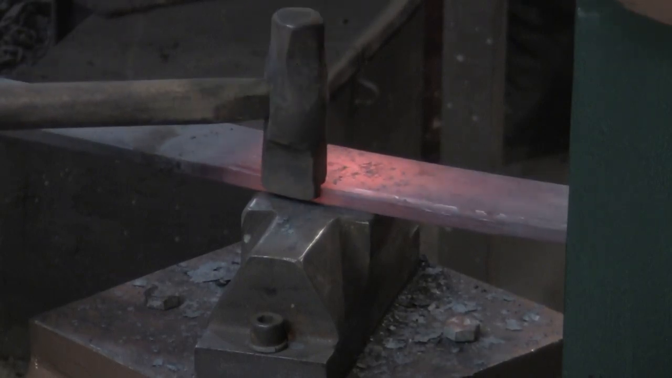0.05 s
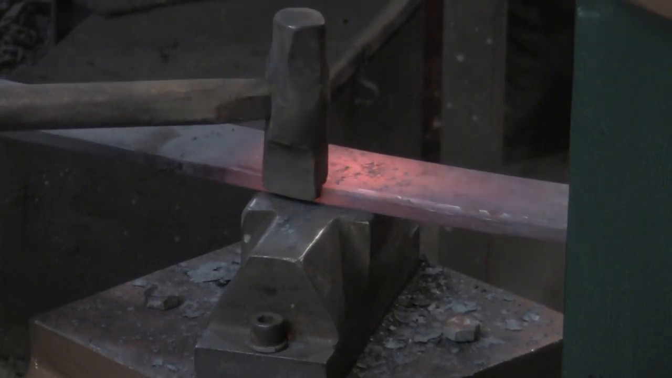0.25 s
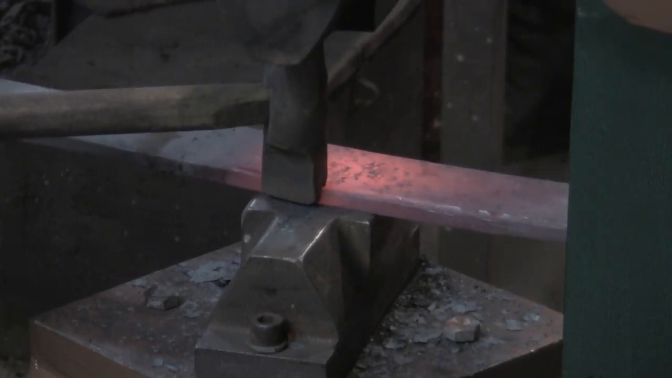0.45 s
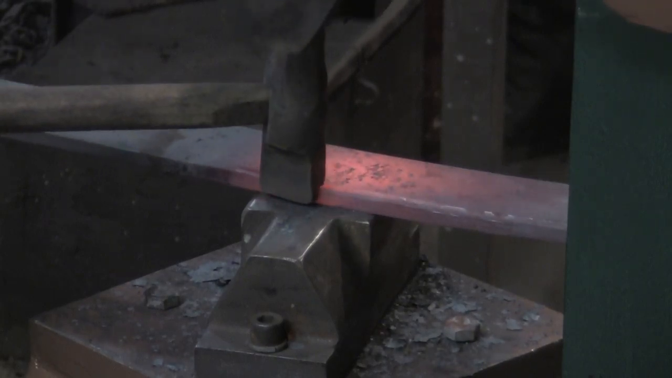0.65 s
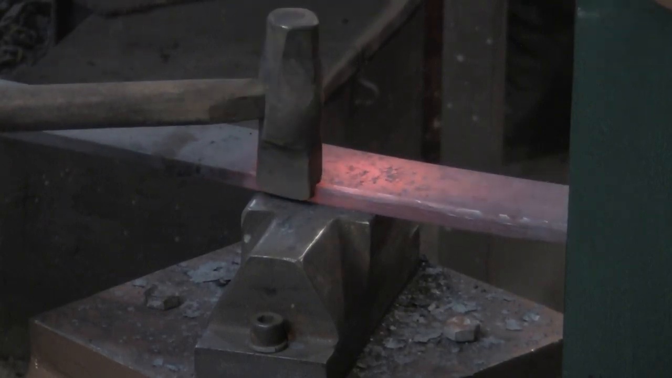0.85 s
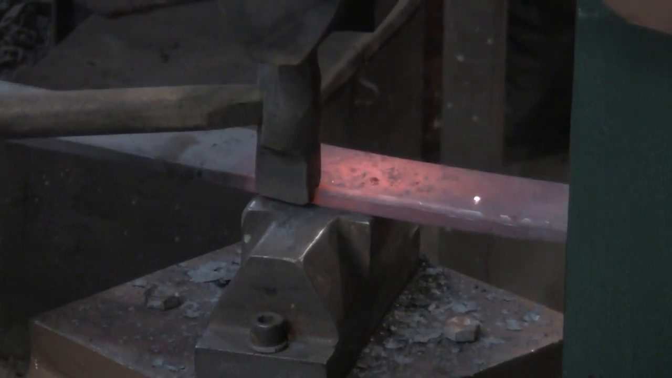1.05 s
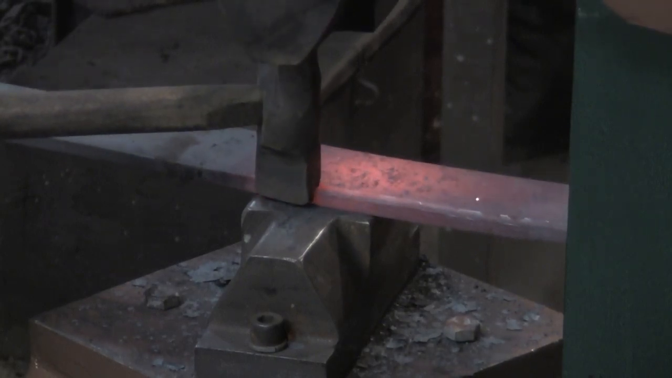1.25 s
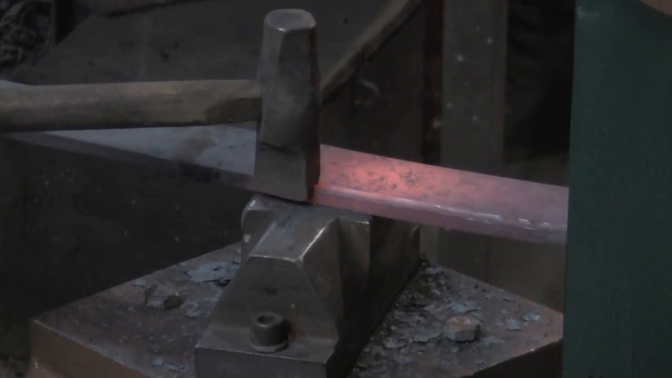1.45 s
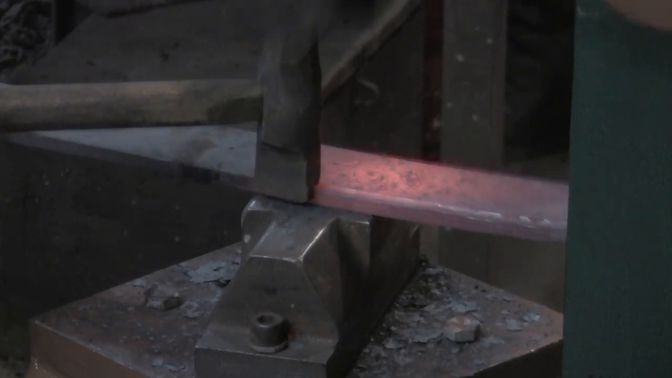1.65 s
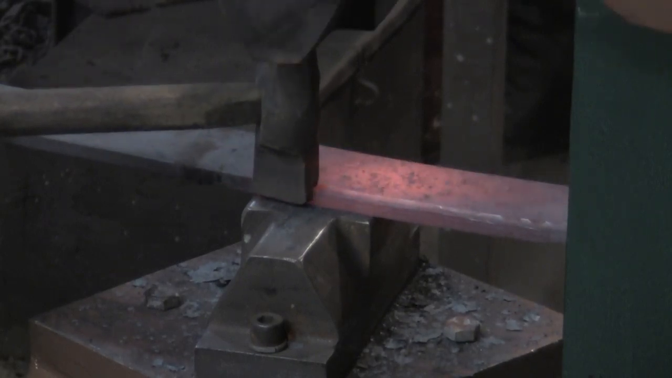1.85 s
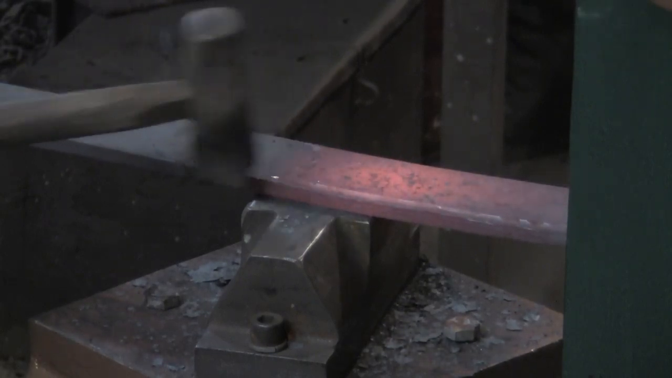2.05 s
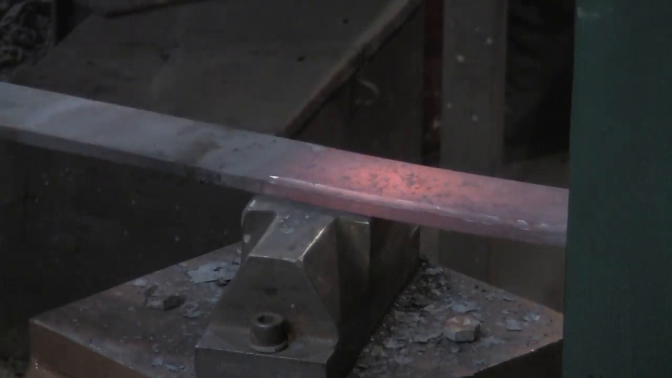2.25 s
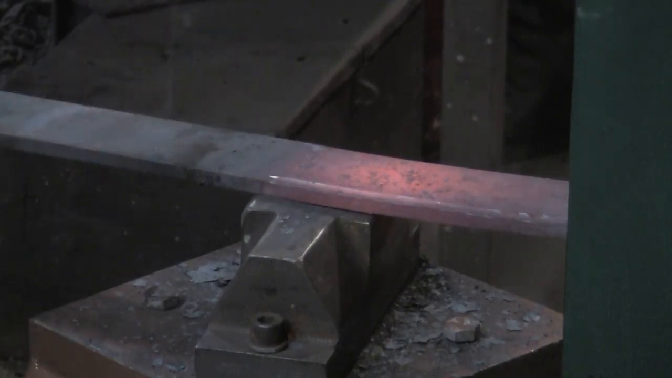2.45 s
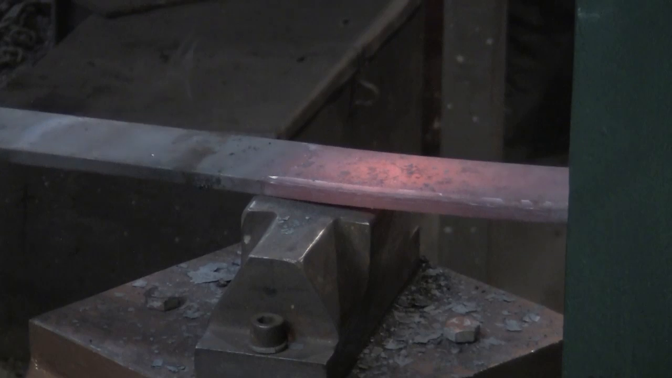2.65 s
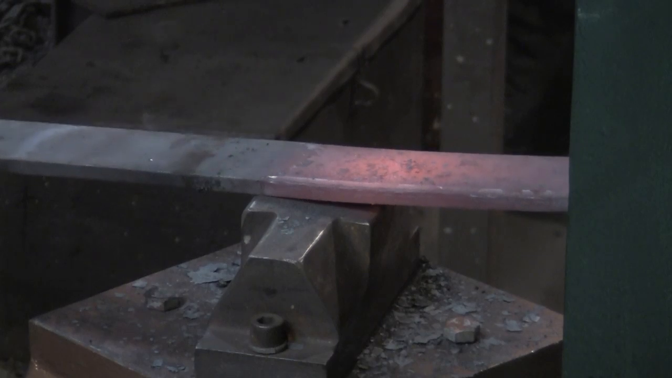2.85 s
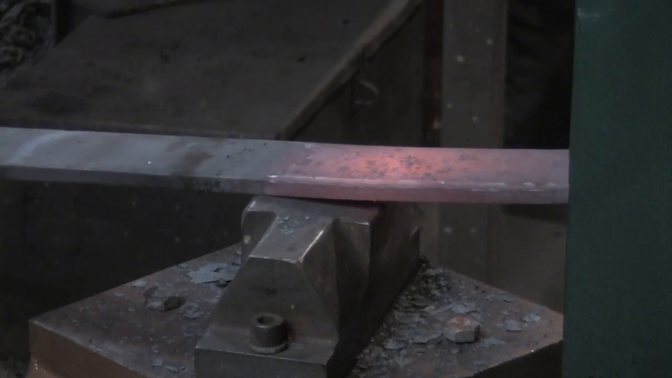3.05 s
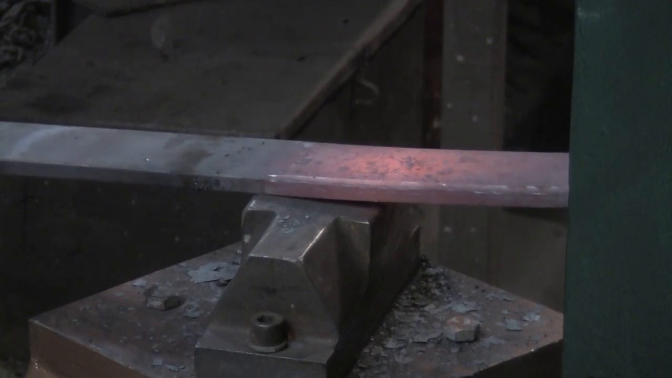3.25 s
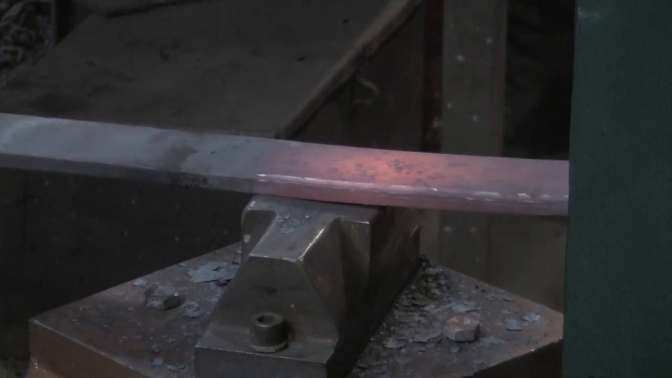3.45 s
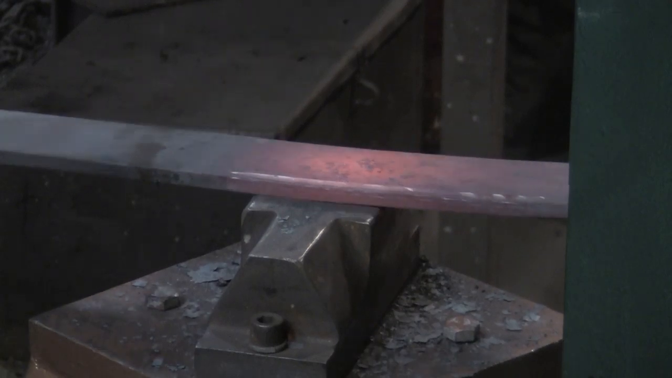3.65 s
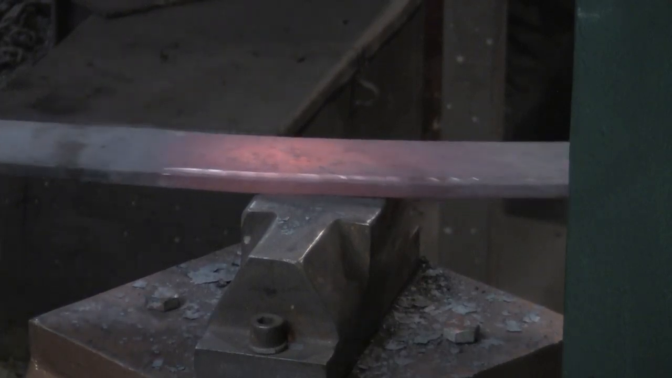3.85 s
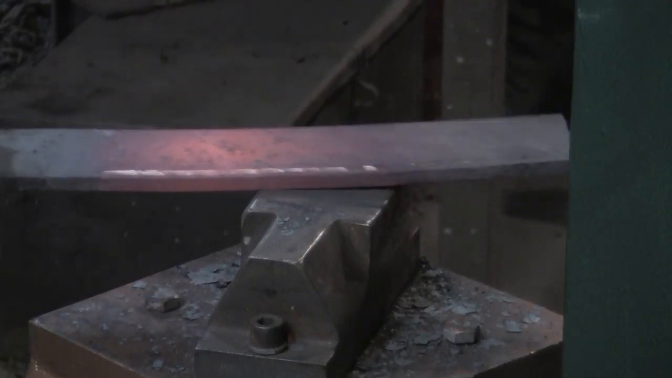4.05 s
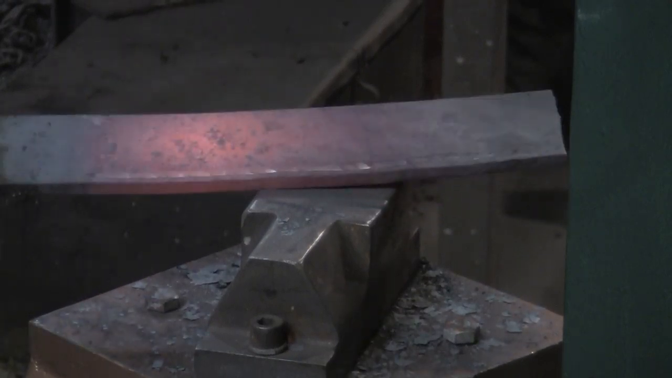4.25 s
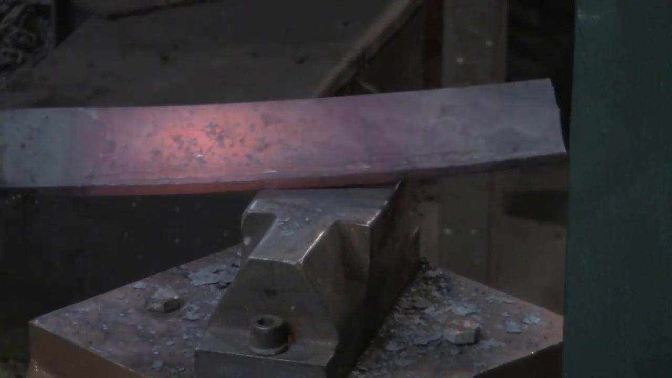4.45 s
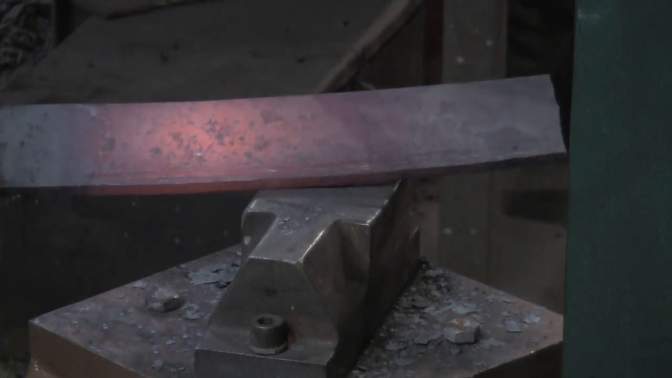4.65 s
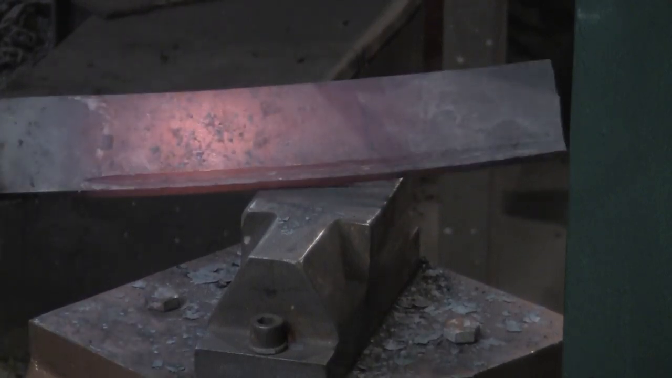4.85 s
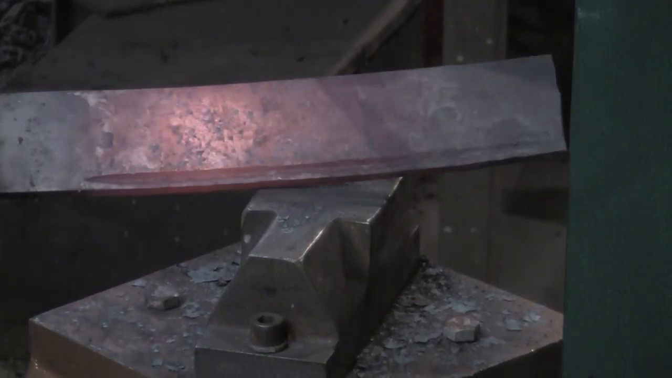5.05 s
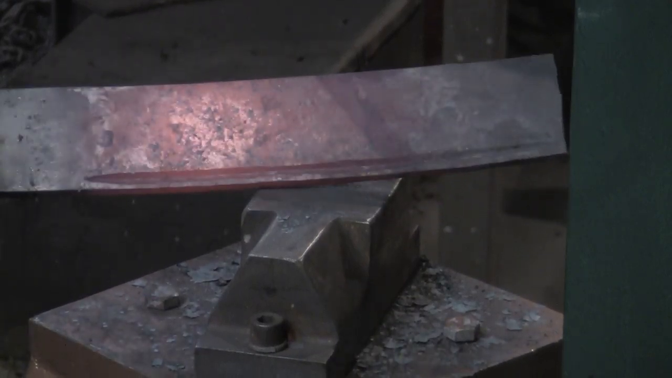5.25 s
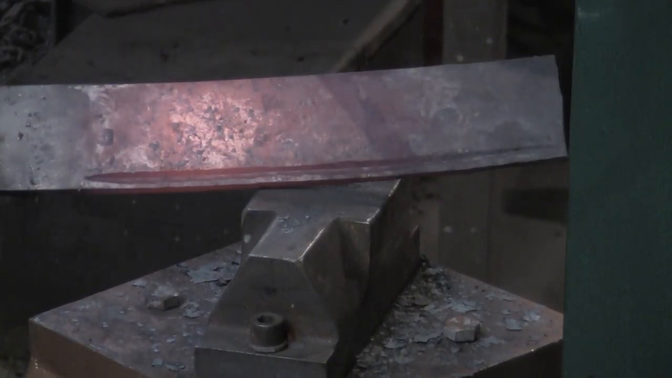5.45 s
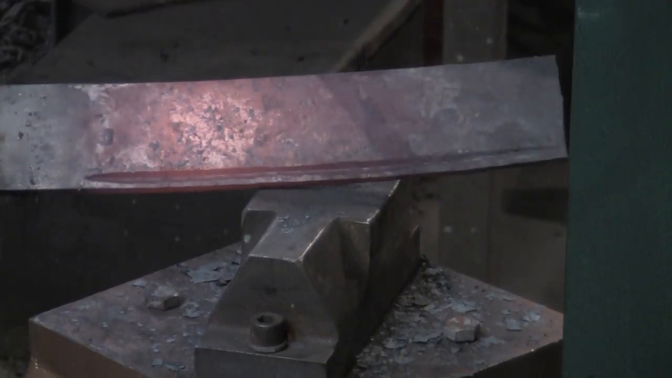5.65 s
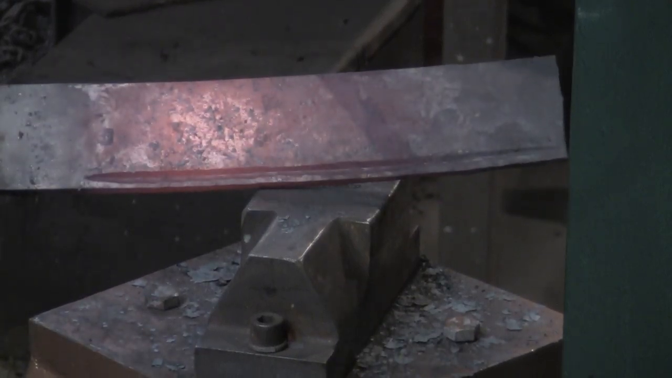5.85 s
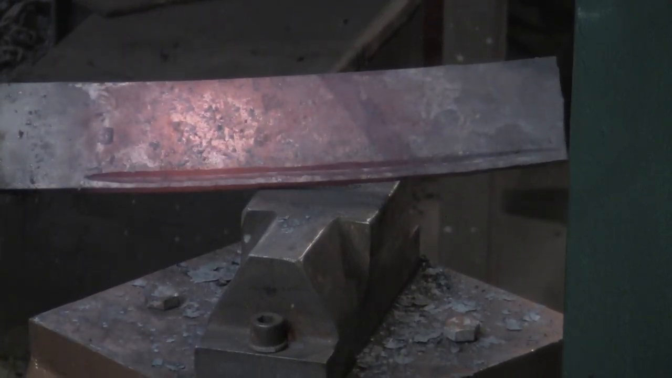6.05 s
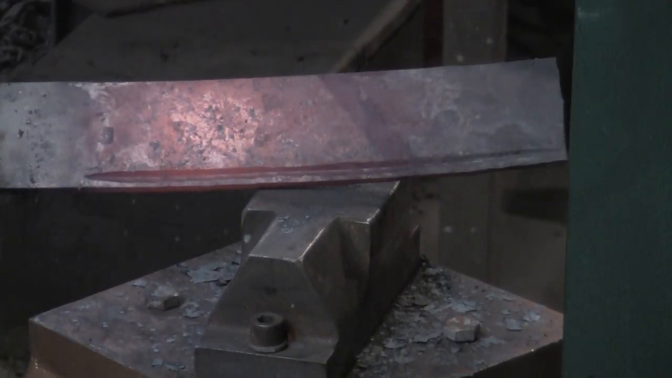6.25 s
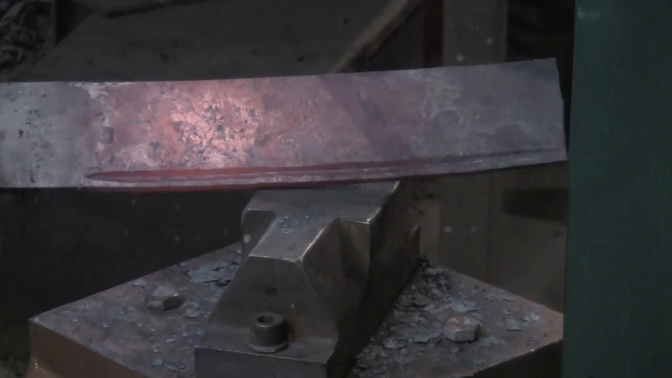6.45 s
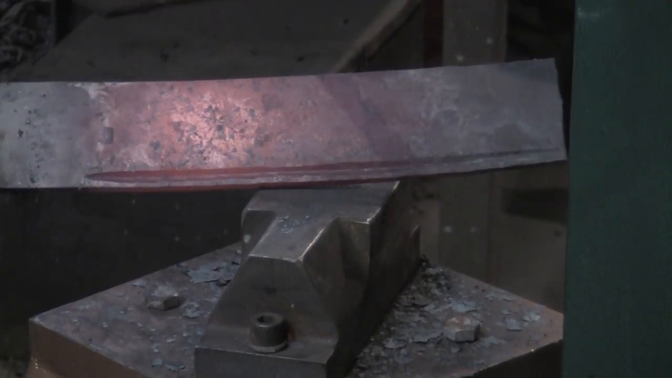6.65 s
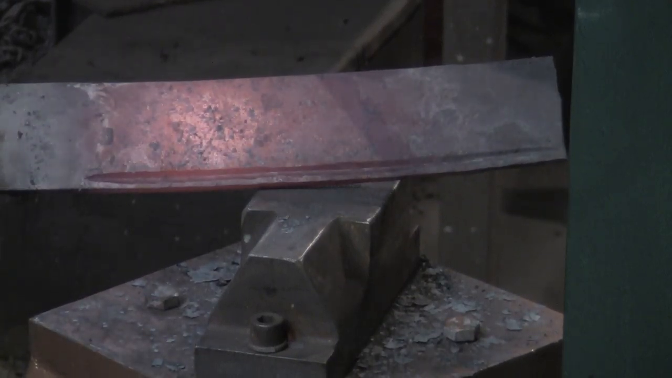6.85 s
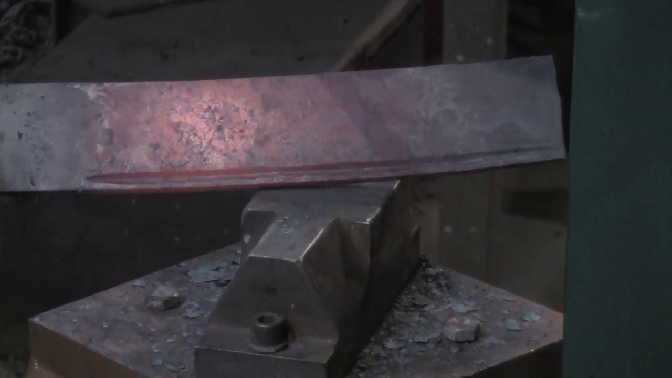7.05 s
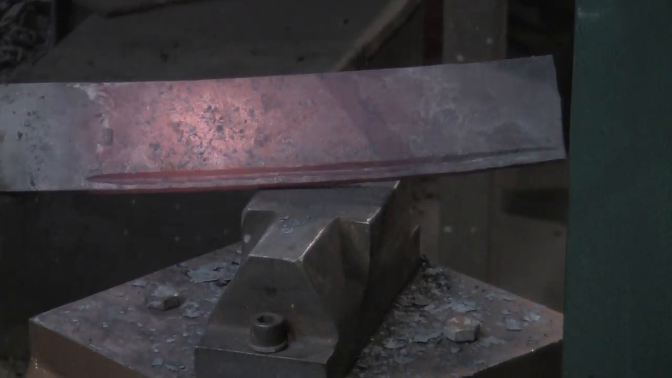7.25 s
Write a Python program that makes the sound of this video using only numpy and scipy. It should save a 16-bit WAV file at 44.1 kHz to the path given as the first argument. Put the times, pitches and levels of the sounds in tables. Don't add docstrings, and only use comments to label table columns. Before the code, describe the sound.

An air hammer slams three times in a hard, echoing forge, stops with a hiss and knock; metal clanks, drags briefly, and a low roar remains.

```python
import sys
import numpy as np
from scipy import signal
from scipy.fft import rfft, irfft, next_fast_len
from scipy.io import wavfile

SR = 44100
rng = np.random.default_rng(int(sys.argv[2]) if len(sys.argv) > 2 else 0)


def bounce(signal):
    frames = np.transpose(np.atleast_2d(signal))
    limited = np.clip(frames, -1, 1)
    pcm = np.round(limited * 32767).astype(np.int16)
    wavfile.write(sys.argv[1], SR, pcm)


def attenuation_scalar(level_db):
    decades = np.asarray(level_db, float) / 20
    return 10 ** decades


N = 321930
T = np.arange(N) / SR
PAD = next_fast_len(N + 2 * SR)

# t/s, body level/dB, crack level/dB, ring level/dB
BLOWS = [
    (0.3961, 23.5, 35, 19),
    (1.0753, 25, 33, 20.5),
    (1.7558, 25, 34.5, 23),
]
# f/Hz, density/dB per Hz
BLOW_COLOUR = [(50, -85), (110, -20.5), (200, -6.5), (400, -11.5), (1160, -7), (1450, -15), (1850, -5),
               (2300, -15.5), (3970, -16.5), (5500, -24), (8000, -25.5), (9800, -30), (11500, -64)]
# f/Hz, level/dB, t60/s
RAM_CRACK = [(3970, 8.5, 0.015), (3340, 0, 0.025), (2625, 1, 0.026), (323, 6.5, 0.049), (760, -25.5, 0.065),
             (1420, -15.5, 0.09)]
RAM_HZ = [1787, 1923, 371, 824, 1163, 2408, 3736, 4021]
# level/dB, t60/s
RAM_RING = [(-2.5, 0.58), (5.5, 0.43), (-12.5, 0.69), (0.5, 0.1), (-31, 0.17), (-14, 0.33), (-4, 0.11),
            (-30, .12)]
# f/Hz, density/dB per Hz
KNOCK_COLOUR = [(120, -14.5), (220, -11.5), (750, -11), (2400, -13.5), (5000, -22), (12000, -27.5)]
# f/Hz, level/dB, t60/s
KNOCK_CRACK = [(192, 2.5, 0.1), (754, 9, 0.037), (2320, -14.5, .04)]
KNOCK_HZ = [2330, 2900, 760]
# level/dB, t60/s
KNOCK_RING = [(7, 0.15), (-2.5, 0.1), (-2, 0.57)]
# f/Hz, density/dB per Hz
EXHAUST_COLOUR = [(290, -62.5), (500, -9.5), (1180, -6.5), (1660, -4.5), (1880, 9.5), (2130, -10.5),
                  (2350, 3.5), (2850, -7), (3060, -2.5), (7200, -6.5), (9490, -1.5), (12700, -15),
                  (13600, -55)]
# f/Hz, density/dB per Hz
INLET_COLOUR = [(600, -30), (1500, -7.5), (3000, -13.5), (5000, -13.5), (8500, -7.5), (9800, -10.5),
                (11300, -13.5), (12600, -13), (13600, -32)]
# f/Hz, width/Hz, level/dB
WHISTLES = [
    (9080, 240, -7.5),
    (9680, 530, -0.5),
]
# t/s, body level/dB, crack level/dB, ring level/dB
TOOL_DOWN = [
    (2.230, 22.5, 35, -9),
    (2.282, 10.5, 21, 14),
]
# f/Hz, density/dB per Hz
TOOL_COLOUR = [(150, -82), (300, -22.5), (500, -18), (811, -9), (1200, -15.5), (1530, -9), (2100, -19.5),
               (4000, -31.5), (9460, -42), (11000, -82)]
# f/Hz, level/dB, t60/s
TOOL_CRACK = [(1630, 8, 0.028), (730, -2.5, 0.068), (2230, -14, 0.012), (4000, -11, 0.0072)]
TOOL_HZ = [764, 829, 974, 1254, 1523, 1680, 1760]
# level/dB, t60/s
TOOL_RING = [(6, 0.092), (-3, .1), (-2, 0.08), (-6.5, 0.15), (-3.5, 0.31), (-7.5, .3), (-31, .2)]
# t/s, body level/dB, crack level/dB, ring level/dB
BAR_DROP = [
    (2.8733, 20.5, 33.5, 20.5),
]
# f/Hz, density/dB per Hz
BAR_COLOUR = [(100, -98), (300, -60), (600, -5.5), (1050, -8), (2690, -10.5), (3300, -15.5), (4000, -19),
              (6000, -27), (9950, -28), (11000, -74)]
# f/Hz, level/dB, t60/s
BAR_CRACK = [(1246, 2.5, 0.21), (2620, -5.5, 0.0084), (1600, -3.5, 0.052)]
BAR_HZ = [894, 980, 1254, 1350, 1610, 1820, 2024, 2116, 2309, 2482, 2589, 2660, 2772, 2896, 3262, 3758,
          3951]
# level/dB, t60/s
BAR_RING = [(-0.5, 0.42), (-0.5, 0.29), (-5.5, 0.53), (3, 0.29), (2, 0.36), (0.5, 0.3), (4.5, 0.17),
            (0, 0.25), (-5, 0.26), (1.5, 0.43), (-12, 0.36), (1, 0.17), (-1, 0.47), (-3.5, 0.22),
            (-14, 0.15), (-9, 0.21), (-4, 0.2)]
# t/s, body level/dB, crack level/dB, ring level/dB
HEEL_DROP = [
    (2.920, 16.5, 8, 15),
]
# f/Hz, density/dB per Hz
HEEL_COLOUR = [(100, -65), (220, -31), (400, -3.5), (800, -5.5), (1500, -9), (4000, -51), (11000, -62)]
# f/Hz, level/dB, t60/s
HEEL_CRACK = [(800, 0, .03), (2600, -10, .015)]
HEEL_HZ = [300, 420, 581, 668, 727, 810]
# level/dB, t60/s
HEEL_RING = [(-1, 0.16), (4, 0.45), (1, 0.27), (-10.5, 0.93), (4.5, 0.24), (-1.5, 0.84)]
# f/Hz, width/Hz, level/dB
SLIDE_RINGS = [(1999, 7.8, 15), (2500, 45, 5), (3220, 50, 9), (3950, 110, 1), (4500, 61, -7),
               (4740, 57, -5.5), (5430, 100, -10), (6050, 69, -15), (6560, 42, -17), (7140, 33, -11),
               (8400, 52, -18), (8950, 71, -12.5), (9650, 280, -28), (10400, 29, -28)]
# f/Hz, width/Hz, level/dB
HUMS = [
    (219.1, 0.29, -34),
    (119.2, 7.6, -43.5),
    (83.5, 11, -54.5),
    (404.5, 50, -41),
    (593.3, 32, -40.5),
]
# f/Hz, density/dB per Hz
SHOP = [(20, -12.5), (55, -24.5), (110, -21.5), (170, -20), (240, -19.5), (315, -26), (400, -18),
        (520, -20), (900, -21), (1230, -29.5), (1500, -25.5), (2570, -40), (10300, -55), (11500, -66.5)]
# f/Hz, side minus mid/dB
SHOP_WIDTH = [(60, -22.5), (180, -17.5), (520, -13), (1520, -16), (4470, -9.5), (13200, -2)]
# f/Hz, t60/s
ROOM_T60 = [(100, 0.43), (400, 0.72), (1500, 0.78), (4000, 0.64), (9000, 0.37), (14000, 0.07)]
# f/Hz, side minus mid/dB
WIDTH = [(60, -1.5), (180, -15.5), (520, -17), (1520, -15.5), (4470, -11), (13200, -1)]
# t/s, level/dB
FADE = [(6.85, 0), (7.1, -2), (7.3, -5)]

BLOW_S = np.array(BLOWS)[:, 0]
CYCLE_S = 0.68
STOP_S = 1.958
STRIKE_SCATTER_DB = 1.0
RING_DIRECT, RING_TO_ROOM = 0.99, 0.71
# opens/s, shuts/s, level/dB
PILOT = (-0.145, -0.097, -46.5)
INLET = (-0.052, 0.024, -25.5)
EXHAUST = (0.24, 0.308, -8.5)
STOP_EXHAUST_S, STOP_EXHAUST_DB = 0.026, -1.7
BUILD_DB, BUILD_LEAD_S = 1.24, 0.0033
# body level/dB, crack level/dB, ring level/dB
PILOT_KNOCK, SEAT_KNOCK, STOP_KNOCK = (-12, -5, -16), (-1, -12, -5), (11, 23.8, -32)
SLIDE_S, LIFT_S = 3.9, 4.1
SLIDE_DB, SWELL_DB_S, EASE_DB_S, LIFT_DB_S = -42.5, 43, 50, 150
SLIDE_FLICKER_DB, SLIDE_FLICKER_S = 1, 0.092
TICK_S, TICK_DB, TICK_HZ, TICK_T60 = 4.274, -45, 9000, 0.005
HISS_S, HISS_DB, HISS_HZ = 0.035, -35, (2500, 10000)
SHOP_DB = -34


def struck(hits, spectrum, crack, pitches, modes, snap_s, snap_hz):
    hits = np.array(hits)
    at = np.round(hits[:, 0] * SR).astype(int)
    body_db, crack_db, ring_db = hits[:, 1:].T
    snap = clicks(at, crack_db - 22.5)
    snap = signal.lfilter([1], [1, -np.exp(-1 / (snap_s * SR))], snap + 1e-18)
    near = passed(snap * rng.standard_normal(N), 2, 400, "high")
    for hz, db, t60 in crack:
        luck_db = rng.normal(0, STRIKE_SCATTER_DB, len(hits))
        late = round(0.7 * SR / hz)
        near += ring(clicks(at + late, crack_db - 28.5 + db + luck_db), hz, t60)
    far = np.zeros(N)
    for hz, (db, t60) in zip(pitches, modes):
        luck_db = rng.normal(0, STRIKE_SCATTER_DB, len(hits))
        far += ring(clicks(at, ring_db - 23.0 + db + luck_db), hz, t60)
    near = passed(near, 3, snap_hz, "low")
    pulse = colour(clicks(at, body_db + 29.5), spectrum)
    return near + RING_DIRECT * far, RING_TO_ROOM * far + pulse


def ram_blows():
    return struck(BLOWS, BLOW_COLOUR, RAM_CRACK, RAM_HZ, RAM_RING, snap_s=0.007, snap_hz=6500)


def each_stroke(valve, blows):
    on, off, db = valve
    return [(s + on - BUILD_LEAD_S * k, s + off, db + BUILD_DB * k) for k, s in enumerate(blows)]


def exhausts():
    full = each_stroke(EXHAUST, BLOW_S - CYCLE_S)
    return full + [(STOP_S - STOP_EXHAUST_S, STOP_S, STOP_EXHAUST_DB)]


def valve_knocks():
    seats = [(off, *SEAT_KNOCK) for _, off, _ in exhausts()[:-1]]
    pilots = [(off, *PILOT_KNOCK) for _, off, _ in each_stroke(PILOT, BLOW_S)]
    knocks = seats + pilots + [(STOP_S, *STOP_KNOCK)]
    return struck(knocks, KNOCK_COLOUR, KNOCK_CRACK, KNOCK_HZ, KNOCK_RING, snap_s=0.0097, snap_hz=3000)


def air():
    swell, gate = np.zeros(N), np.zeros(N)
    for on, off, db in exhausts():
        opening = np.clip((T - on) / (off - on), 0, 1) ** 2.5
        swell += attenuation_scalar(db) * opening * np.exp(-np.maximum(T - off, 0) / 0.017)
    for on, off, db in each_stroke(PILOT, BLOW_S) + each_stroke(INLET, BLOW_S):
        opening = np.clip((T - on) / 0.021, 0, 1)
        gate += attenuation_scalar(db) * opening * np.clip((off - T) / 0.008 + 1, 0, 1)
    noise = rng.standard_normal((3, N))
    out_port, in_port = [attenuation_scalar(db) * rms_one(ring(noise[2], hz, 2.8 / width)) for hz, width, db in WHISTLES]
    exhaust = rms_one(colour(noise[0], EXHAUST_COLOUR)) + out_port
    inlet = rms_one(colour(noise[1], INLET_COLOUR)) + in_port
    return swell * exhaust + gate * inlet


def tool_down():
    return struck(TOOL_DOWN, TOOL_COLOUR, TOOL_CRACK, TOOL_HZ, TOOL_RING, snap_s=0.0012, snap_hz=5430)


def bar_drop():
    return struck(BAR_DROP, BAR_COLOUR, BAR_CRACK, BAR_HZ, BAR_RING, snap_s=0.00049, snap_hz=7000)


def heel_drop():
    return struck(HEEL_DROP, HEEL_COLOUR, HEEL_CRACK, HEEL_HZ, HEEL_RING, snap_s=0.003, snap_hz=4000)


def lead_in_hiss():
    landings = (TOOL_DOWN[0][0], BAR_DROP[0][0])
    swell = sum(np.clip(1 - (s - T) / HISS_S, 0, 1) * (T < s) for s in landings)
    return attenuation_scalar(HISS_DB) * swell * rms_one(passed(rng.standard_normal(N), 2, HISS_HZ, "band"))


def slide():
    grit = attenuation_scalar(1.9 * rng.exponential(1, N)) * rng.choice([-1, 1], N)
    grit = grit * (rng.random(N) < 1200 / SR)
    rings = np.zeros(N)
    for hz, width, db in SLIDE_RINGS:
        level = attenuation_scalar(db / 2 + SLIDE_FLICKER_DB * flicker()) * np.sqrt(width)
        rings += level * rms_one(ring(grit, hz, 2.0 / width))
    rub = passed(grit, 4, [2000, 10000], "band")
    level_db = SLIDE_DB - SWELL_DB_S * np.maximum(SLIDE_S - T, 0)
    level_db = level_db - EASE_DB_S * np.maximum(T - SLIDE_S, 0) - LIFT_DB_S * np.maximum(T - LIFT_S, 0)
    drag = (1.16 * rms_one(rings) + 0.24 * rms_one(rub)) * attenuation_scalar(level_db - 4)
    flake = attenuation_scalar(TICK_DB) * (np.arange(N) == round(TICK_S * SR))
    return drag + ring(flake, TICK_HZ, TICK_T60)


def flicker():
    knots = np.arange(0, T[-1] + 1, SLIDE_FLICKER_S)
    return np.interp(T, knots, rng.standard_normal(len(knots)))


def room(x, build_s, pan_db):
    t, white, tail = T[:2 * SR], rng.standard_normal((2, 2, 2 * SR)), 0
    edges = 60 * 2 ** np.arange(0, 8.1, .5)
    for k, (low, high) in enumerate(zip(edges, edges[1:])):
        band = passed(white[k % 2], 2, [low, high], "band")
        t60 = max(at_hz(ROOM_T60, np.sqrt(low * high)), .1)
        tail = tail + band * attenuation_scalar(-60 * t / t60)
    tail = tail * (1 - np.exp(-t / build_s))
    tail = spread(tail[0], colour(tail[1], WIDTH), pan_db) / np.sqrt(np.sum(tail[0] ** 2))
    return irfft(rfft(x, PAD) * rfft(tail, PAD), PAD)[:, :N]


def shop():
    lead = SR
    noise = rng.standard_normal((4, N + lead))
    roar = rms_one(colour(noise[0], SHOP))
    side = colour(rms_one(colour(noise[1], SHOP)), SHOP_WIDTH)
    wobble = rms_one(signal.lfilter([1], [1, -.9995], noise[3]))
    (hz, depth_db, db), *ducts = HUMS
    phase = 2 * np.pi * hz * np.arange(N + lead) / SR + 0.29 * wobble
    hum = attenuation_scalar(db + 2.5 + depth_db * wobble) * np.sin(phase)
    hum = hum + sum(attenuation_scalar(db) * narrow(noise[2], hz, width) for hz, width, db in ducts)
    return spread((attenuation_scalar(SHOP_DB) * roar + hum)[lead:], (attenuation_scalar(SHOP_DB) * side)[lead:], pan_db=.5)


def clicks(at, db):
    x = np.zeros(N)
    x[at] = attenuation_scalar(db)
    return x


def ring(x, hz, t60):
    r, w = attenuation_scalar(-60 / (t60 * SR)), 2 * np.pi * hz / SR
    return signal.lfilter([0, np.sin(w)], [1, -2 * r * np.cos(w), r * r], x + 1e-18)


def narrow(x, hz, width_hz):
    return rms_one(ring(ring(x, hz, 2.2 / width_hz), hz, 2.2 / width_hz))


def passed(x, order, hz, kind):
    return signal.sosfilt(signal.butter(order, hz, kind, fs=SR, output="sos"), x)


def colour(x, spectrum):
    cepstrum = irfft(np.log(attenuation_scalar(at_hz(spectrum, np.linspace(0, SR / 2, 4097)))))
    cepstrum[1:4096] *= 2
    cepstrum[4097:] = 0
    return signal.fftconvolve(x, irfft(np.exp(rfft(cepstrum))))[:len(x)]


def at_hz(points, hz):
    table_hz, value = np.transpose(points)
    return np.interp(np.log(hz + 1e-9), np.log(table_hz), value)


def rms_one(x):
    return x / np.sqrt(np.mean(x ** 2) + 1e-20)


def spread(mid, side, pan_db):
    return np.array([mid + side, mid - side]) * attenuation_scalar([[pan_db / 2], [-pan_db / 2]])


def scene():
    ram, valve = ram_blows(), valve_knocks()
    tool, bar, heel = tool_down(), bar_drop(), heel_drop()
    jets, drag = air(), slide()
    direct = ram[0] + valve[0] + tool[0] + bar[0] + heel[0] + jets + drag + lead_in_hiss()
    hammer = room(ram[1] + valve[1] + 0.51 * jets, build_s=0.0013, pan_db=-0.65)
    bench = room(tool[1] + bar[1] + heel[1] + 1.07 * drag, build_s=0.0018, pan_db=-0.4)
    direct = spread(direct, 0.22 * np.roll(direct, 9), pan_db=-1.0)
    return direct + hammer + bench + shop()


def lag(x, seconds):
    r = np.exp(-1 / (seconds * SR))
    return signal.lfilter([1 - r], [1, -r], x)


def gain_control(x, ceiling_db, window_s, attack_s, release_db_s, slow_share, slow_s):
    level_db = 10 * np.log10(lag(np.mean(x ** 2, axis=0), window_s) + 1e-12)
    recovery_db = release_db_s * T
    excess = np.maximum.accumulate(np.maximum(level_db - ceiling_db, 0) + recovery_db) - recovery_db
    duck_db = lag(excess, attack_s) + slow_share * lag(excess, slow_s)
    ahead = round(0.0047 * SR)
    return x * attenuation_scalar(-np.append(duck_db[ahead:], duck_db[-ahead:]))


def low_pass(x):
    return signal.sosfilt(signal.butter(12, 13750, fs=SR, output="sos"), x)


def record(dry):
    x = gain_control(dry, ceiling_db=-11.5, window_s=0.0022, attack_s=0.0078, release_db_s=98,
                     slow_share=0.027, slow_s=0.75)
    x = passed(np.tanh(x * 0.82) / 1.044, 3, 85, "high")
    x = passed(x, 8, 12900, "low")
    mix = x * attenuation_scalar(np.interp(T, *np.transpose(FADE)))
    return low_pass(mix)


dry = scene()
out = record(dry)
bounce(out)
```